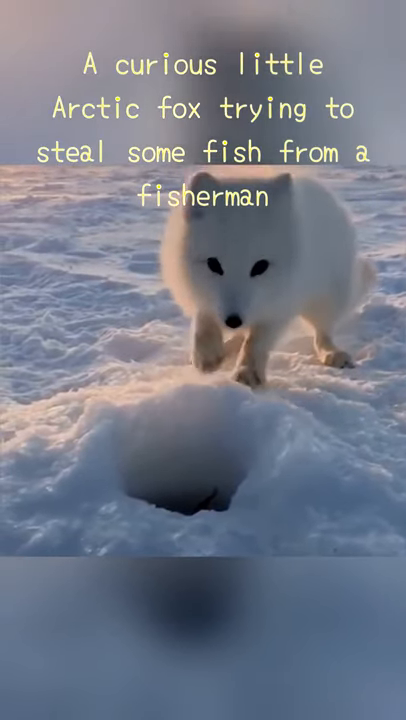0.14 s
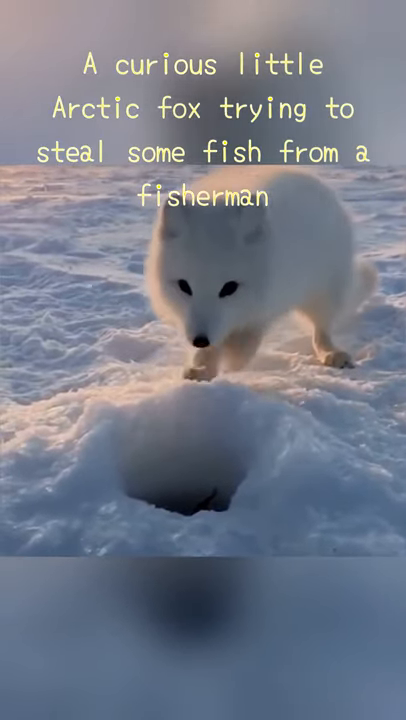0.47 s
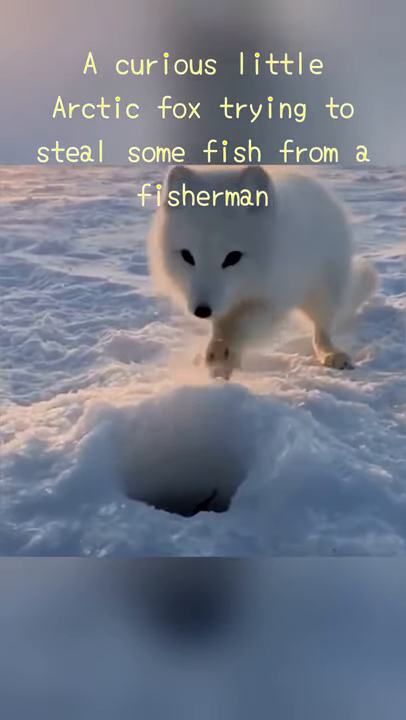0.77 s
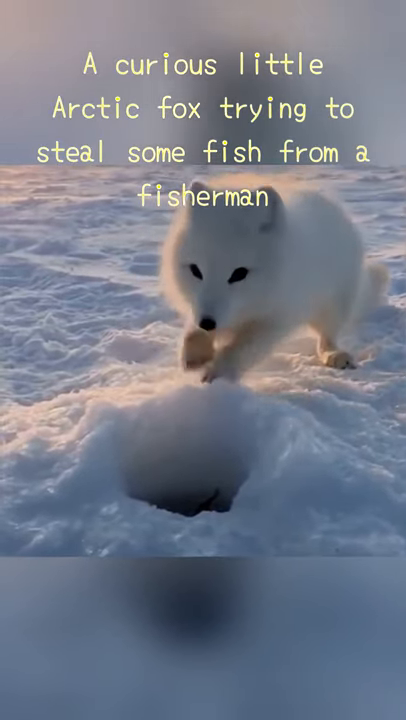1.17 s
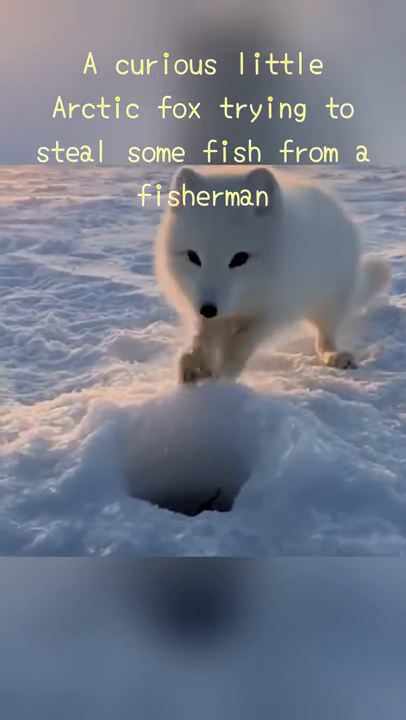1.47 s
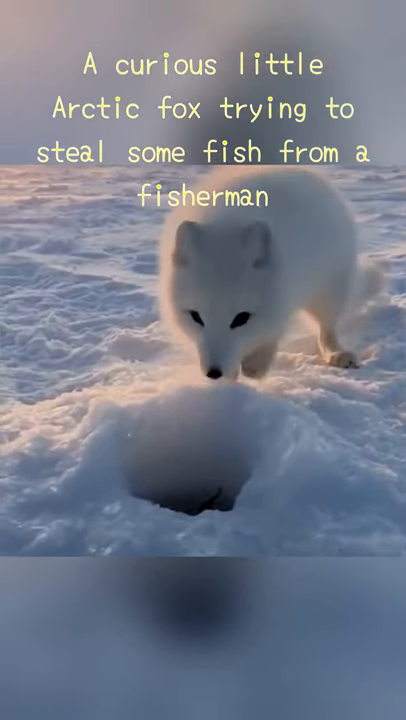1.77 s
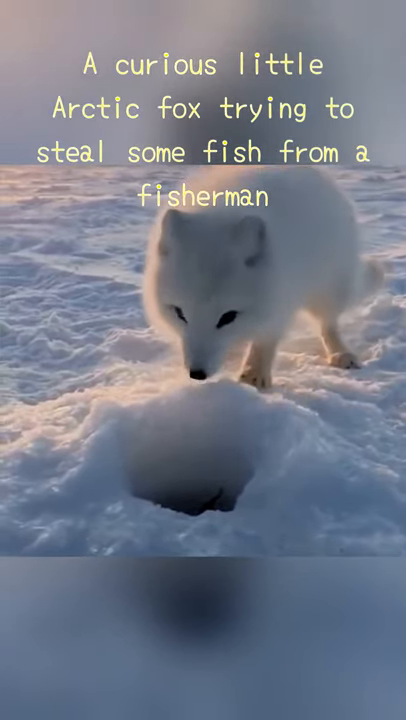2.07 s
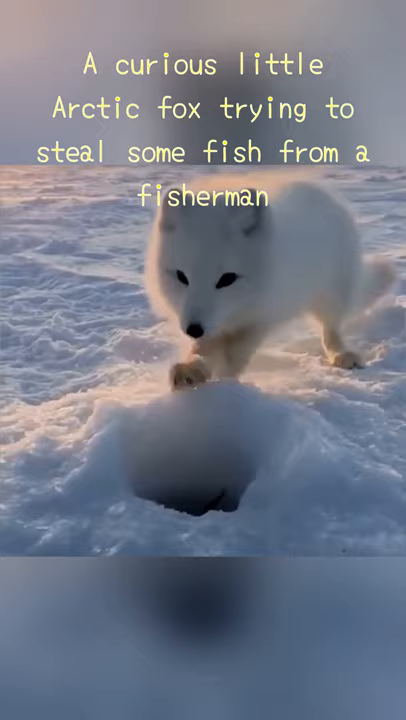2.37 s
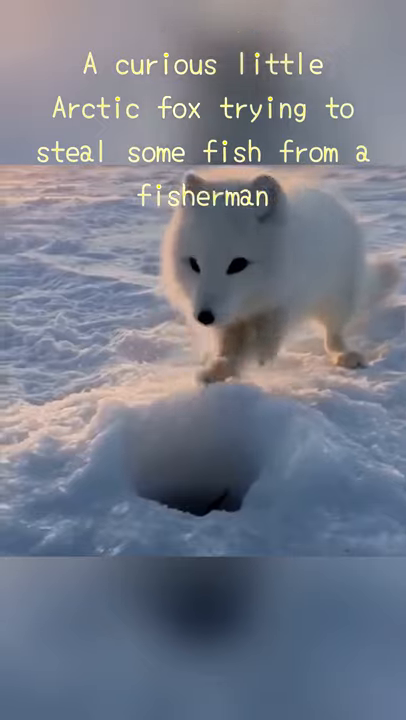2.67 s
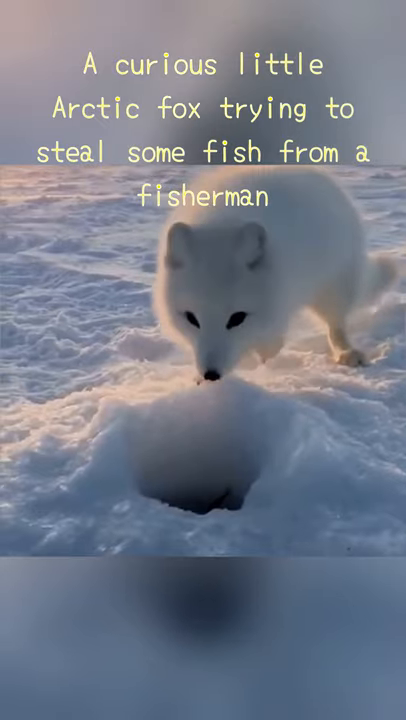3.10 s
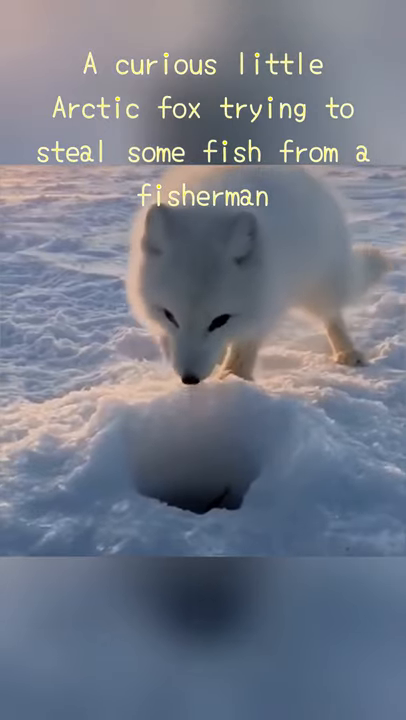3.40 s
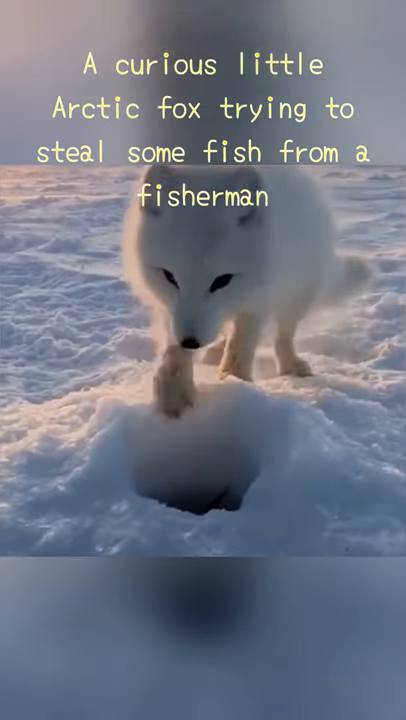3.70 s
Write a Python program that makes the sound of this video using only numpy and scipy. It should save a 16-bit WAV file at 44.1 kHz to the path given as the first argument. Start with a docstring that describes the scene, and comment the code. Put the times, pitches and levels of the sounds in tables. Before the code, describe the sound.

A fox digs in packed snow close to the microphone. Quick runs of scratchy, crunching paw strokes break off in short pauses, with small snaps of icy crust and a few soft thuds, in still open air.

```python
"""A fox digs in packed snow, close by, in quick runs of paw strokes with short pauses.
Each stroke breaks a swarm of ice grains: claws fizz on the crust, clumps crunch, the paw rumbles below.
Bits of crust snap, clods knock, ice splinters tinkle, and the snow thuds under the fox's weight.
Loose crystals tick as they settle; the open air adds a faint low rumble."""
import sys
import numpy as np
from scipy import signal
from scipy.io import wavfile
from scipy.ndimage import uniform_filter1d

SR = 44100
rng = np.random.default_rng(int(sys.argv[2]) if len(sys.argv) > 2 else 0)


def materialize(psi):
    """Save the field psi as 16-bit PCM at rate SR to the path in sys.argv[1].

    A 1-D psi becomes a single channel; in a 2-D psi each row is a channel.
    """
    bounded = np.clip(np.atleast_2d(psi).T, -1, 1)
    quanta = np.round(bounded * 32767).astype(np.int16)
    wavfile.write(sys.argv[1], SR, quanta)


N = 169785

# spectra: freq_hz, relative_density_db
AIR_SPECTRUM = [(15, -39), (25, -7), (108, 3.5), (301, -16), (818, -24), (5430, -30), (16000, -36)]
SNAP_SPECTRUM = [(600, -10), (1500, -0.5), (4000, -3.5), (12400, -1.5), (13400, -17)]
PUSH_SPECTRUM = [(30, -31), (52, -8), (80, -3), (350, -4), (520, -12), (2500, -35)]
CRUNCH_SPECTRUM = [(250, -17.5), (550, -9), (850, -8), (1400, -0.5), (4200, -4), (8000, -14)]
FIZZ_SPECTRUM = [(1200, -43.5), (2400, -6), (3500, -0.5), (6500, 0.5), (8500, -1), (10300, 3.5),
                 (12700, -0.5), (13300, -9), (16000, -9.5)]
# crust resonance and notch: centre_hz, width_hz, gain_db
CRUST_BANDS = [(2620, 190, 3.5), (3182, 36, -22)]
# paws bearing down: start_s, peak_db, pitch_hz
PAW_THUDS = [(.842, -37.5, 290), (1.338, -39.5, 299), (1.649, -41, 227), (2.770, -40.5, 343),
             (3.752, -47, 62)]
# ice splinters: start_s, peak_db
ICE_TINKLES = [(0.169, -48), (0.177, -36.5), (0.824, -19.5)]
# splinter modes: freq_hz, relative_db, t60_s
SPLINTER_MODES = [(6840, -13, 0.0069), (10750, 5, 0.0036)]
# clods knocking together: start_s, peak_db, pitch_hz
CLOD_KNOCKS = [(0.914, -47, 1420), (1.123, -50, 1460), (1.245, -49.5, 2360), (2.165, -52.5, 450)]
# crust breaking: start_s, peak_db
CRUST_SNAPS = [(.112, -50), (0.201, -50), (.322, -42.5), (0.329, -40.5), (0.355, -33), (.508, -27.5),
               (.706, -30), (0.744, -29), (0.84, -28), (0.846, -28), (.874, -29), (1.150, -34),
               (1.173, -39.5), (1.28, -43), (1.300, -33), (1.318, -27), (1.404, -28), (1.509, -26),
               (1.513, -26.5), (1.539, -31.5), (1.624, -29), (1.656, -27), (1.731, -29), (1.746, -22.5),
               (2.082, -46.5), (2.247, -36), (2.325, -18.5), (2.383, -33.5), (2.420, -24.5), (2.432, -19.5),
               (2.679, -25.5), (2.756, -28), (2.872, -24), (2.881, -28), (2.892, -25.5), (2.978, -27),
               (2.991, -23), (3.106, -30.5), (3.232, -42), (3.53, -54), (3.589, -36), (3.640, -26.5),
               (3.693, -27.5), (3.709, -30.5), (3.792, -38), (3.823, -39), (3.845, -34)]
# paw strokes: peak_s, rise_s, fall_s, fizz_db, crunch_db, push_db
PAW_STROKES = [ (.008, 0.05, 0.026, -44.5, -46.5, -51), (0.352, 0.012, 0.014, -51, -53.5, -56),
               (0.4, 0.026, 0.033, -42, -45.5, -47.5), (.485, 0.019, 0.0073, -49, -51, -62),
               (0.521, 0.012, 0.024, -38, -40.5, -45.5), (0.646, 0.041, 0.018, -40, -44, -46),
               (0.704, 0.013, 0.0089, -43, -46.5, -56), (0.753, .017, 0.028, -40, -44, -42),
               (0.809, 0.0095, 0.017, -47.5, -54.5, -54), (0.863, 0.017, 0.017, -39.5, -40.5, -43.5),
               (0.942, 0.015, 0.0061, -41, -47.5, -54), (0.983, 0.02, 0.031, -42, -45, -46),
               (1.066, 0.019, 0.016, -55.5, -59.5, -57), (1.175, 0.056, 0.076, -65.5, -69.5, -71.5),
               (1.308, 0.012, 0.035, -40, -48.5, -50.5), (1.34, 0.017, 0.019, -46, -40, -44),
               (1.422, 0.056, 0.028, -40, -44, -46), (1.542, 0.021, 0.035, -37, -43, -45),
               (1.66, 0.028, 0.022, -39, -46.5, -45.5), (1.753, 0.021, 0.038, -41, -41, -44.5),
               (1.843, 0.014, 0.0068, -49.5, -47.5, -53), (1.887, 0.015, 0.029, -48, -48.5, -49),
               (1.965, 0.069, 0.062, -69, -66.5, -65), (2.218, 0.012, 0.021, -58.5, -61.5, -55.5),
               (2.269, 0.022, 0.037, -50.5, -63, -58), (2.326, 0.035, 0.025, -36.5, -42.5, -43.5),
               (2.392, 0.012, 0.024, -49, -50, -51.5), (2.434, 0.022, 0.043, -38, -43, -44.5),
               (2.529, 0.023, 0.033, -38.5, -43, -43), (2.632, 0.021, 0.0089, -39.5, -46, -47.5),
               (2.696, 0.022, 0.028, -43, -47.5, -46), (2.765, 0.0078, 0.033, -37, -43, -41.5),
               (2.893, 0.039, 0.028, -38.5, -44.5, -44), (2.945, 0.0077, 0.005, -44, -51.5, -47.5),
               (2.992, 0.023, 0.034, -40.5, -42.5, -46), (3.123, 0.023, 0.016, -41.5, -46, -48),
               (3.16, 0.016, 0.032, -48.5, -52.5, -53), (3.260, 0.055, 0.09, -66, -68.5, -65),
               (3.618, .012, .025, -50, -64, -55), (3.656, 0.013, 0.023, -38.5, -46.5, -44),
               (3.692, 0.023, 0.017, -41, -51.5, -45.5), (3.848, .024, .029, -57, -55.5, -54)]


def amp(db):
    """Decibels to amplitude."""
    return 10 ** (np.asarray(db) / 20)


def unit(x):
    """Scale to unit RMS."""
    return x / np.sqrt(np.mean(x ** 2) + 1e-20)


def add(mix, start_s, sound):
    """Mix a sound in, in place."""
    part = mix[max(round(start_s * SR), 0):][:len(sound)]
    part += sound[:len(part)]


def colour(x, spectrum, bands=()):
    """Minimum-phase filter from a spectrum plus peaks and notches."""
    hz = np.fft.rfftfreq(8192, 1 / SR)
    freq_hz, density_db = np.transpose(spectrum)
    db = np.interp(np.log(hz + 1), np.log(freq_hz), density_db)
    for centre_hz, width_hz, gain_db in bands:
        db = db + gain_db / (1 + (2 * (hz - centre_hz) / width_hz) ** 2)
    log_gain = np.log(amp(np.r_[db, db[-2:0:-1]]))
    taps = np.fft.ifft(np.exp(np.conj(signal.hilbert(log_gain)))).real
    return signal.fftconvolve(x, taps[:len(hz)])[:len(x)]


def air(level_db=-67):
    """Faint outdoor rumble and hiss."""
    return amp(level_db) * unit(colour(rng.standard_normal(N), AIR_SPECTRUM))


def settling(rate_per_s=72, spread_db=4.5, decay_s=0.0042, level_db=-75.5):
    """Loosened crystals trickle back with tiny ticks."""
    size = amp(spread_db * np.minimum(rng.exponential(1, N), 2))
    impacts = size * (rng.random(N) < rate_per_s / SR)
    envelope = signal.lfilter([1], [1, -np.exp(-1 / (decay_s * SR))], impacts)
    return amp(level_db) * unit(colour(envelope * rng.standard_normal(N), SNAP_SPECTRUM))


def scatter(x, level_db, t60_s):
    """Direct sound plus sparse reflections off rough snow."""
    t = np.arange(SR // 3) / SR
    tail = rng.standard_normal(len(t)) * (rng.random(len(t)) < 0.1) * amp(-60 * t / t60_s)
    return x + amp(level_db) * signal.fftconvolve(x, tail / np.linalg.norm(tail))[:N]


def thuds(rise_cycles=1.36):
    """Snow gives under the fox's weight; deeper thuds swell more slowly."""
    out, t = np.zeros(N), np.arange(SR // 4) / SR
    for start_s, peak_db, pitch_hz in PAW_THUDS:
        age = t * pitch_hz / rise_cycles
        swell = (age * np.exp(1 - age)) ** 2
        add(out, start_s, amp(peak_db) * swell * np.sin(2 * np.pi * pitch_hz * t))
    return out


def tinkles():
    """Loose ice splinters ring high and briefly."""
    out, t = np.zeros(N), np.arange(SR // 16) / SR
    ring = sum(amp(db - 60 * t / t60_s) * np.sin(2 * np.pi * hz * t) for hz, db, t60_s in SPLINTER_MODES)
    for start_s, peak_db in ICE_TINKLES:
        add(out, start_s, amp(peak_db) * ring / abs(ring).max())
    return out


def clods(rub_s=0.0022, decay_s=0.001):
    """Loose clods rub and settle with rough, slightly pitched knocks."""
    out, t = np.zeros(N), np.arange(SR // 20) / SR
    for start_s, peak_db, pitch_hz in CLOD_KNOCKS:
        rub = rng.standard_normal(len(t)) * (t / rub_s) * np.exp(-t / rub_s)
        ring = np.exp(-t / decay_s) * np.sin(2 * np.pi * pitch_hz * t)
        knock = signal.fftconvolve(rub, ring)
        add(out, start_s, amp(peak_db) * knock / abs(knock).max())
    return out


def snaps(crack_s=0.00061, crumble_s=0.0047, crumble_db=-3.5):
    """Bits of crust break: a sharp crack, then a brief crumble."""
    out, t = np.zeros(N), np.arange(SR // 25) / SR
    fade = np.exp(-t / crack_s) + amp(crumble_db) * np.exp(-t / crumble_s)
    for start_s, peak_db in CRUST_SNAPS:
        crack = colour(rng.standard_normal(len(t)) * fade, SNAP_SPECTRUM, CRUST_BANDS)
        add(out, start_s, amp(peak_db) * crack / abs(crack).max())
    return out


def effort(layer, lag_s=0, rise_exponent=1.334, fall_exponent=0.94):
    """A layer's envelope: each stroke swells, eases, and stops as the paw lifts."""
    column = ("fizz", "crunch", "push").index(layer)
    t, power = np.arange(N) / SR - lag_s, np.zeros(N)
    for peak_s, rise_s, fall_s, *levels_db in PAW_STROKES:
        near = abs(t - peak_s) < 0.5
        offset_s = t[near] - peak_s
        lift_s = 1.91 * fall_s
        rising = abs(offset_s / rise_s) ** rise_exponent
        falling = abs(offset_s / fall_s) ** fall_exponent + abs(offset_s / lift_s) ** 10
        envelope = np.exp(-np.where(offset_s < 0, rising, falling))
        power[near] += (amp(levels_db[column]) * envelope) ** 2
    return np.sqrt(power)


def crackle(rate_per_s=140, re_fizz_db=-8):
    """Larger crystals give way under the claws with dry, bright clicks."""
    clicks = rng.uniform(-0.2, 1, N) * (rng.random(N) < rate_per_s / SR)
    return amp(re_fizz_db) * unit(colour(clicks, FIZZ_SPECTRUM)) * effort("fizz")


def grains(rate_per_s, spread_db, cap_spreads, even_s):
    """Random fractures of varied size, evened in power over longer spans."""
    size = amp(spread_db * np.minimum(rng.exponential(1, N), cap_spreads))
    clicks = size * rng.choice([-1, 1], N) * (rng.random(N) < rate_per_s / SR)
    span = int(even_s * SR) + 1
    power = uniform_filter1d(uniform_filter1d(clicks ** 2, span), span)
    return clicks / np.sqrt(abs(power) + 0.01 * np.mean(clicks ** 2))


def shards(low_hz, high_hz, decay_cycles, rate_per_s, spread_db, sizes):
    """Each fracture briefly rings one of several grain sizes."""
    clicks = grains(rate_per_s, spread_db, cap_spreads=1.12, even_s=0.031)
    size_index = rng.integers(0, sizes, N)
    out, t = np.zeros(N), np.arange(SR // 100) / SR
    for k, hz in enumerate(np.linspace(low_hz, high_hz, sizes)):
        ring = unit(np.exp(-t * hz / decay_cycles) * np.sin(2 * np.pi * hz * t))
        out += signal.oaconvolve(clicks * (size_index == k), ring)[:N]
    return out


def slips(top_hz, depth_db):
    """Gain flutter: the paw catches and slips, so grains come in clumps."""
    band = signal.butter(2, [top_hz / 4, top_hz], "bandpass", fs=SR, output="sos")
    wobble = unit(signal.sosfilt(band, rng.standard_normal(N)))
    return unit(amp(depth_db * np.clip(wobble, -2, 2)))


def shifting(x, width_hz, hold_s, depth_db):
    """Brief resonances come and go as broken snow changes shape."""
    frame, hop = 512, 128
    spectra = signal.stft(x, nperseg=frame, noverlap=frame - hop)[2]
    patches = rng.standard_normal(spectra.shape)
    spans = (round(width_hz * frame / SR) + 1, round(hold_s * SR / hop) + 1)
    for axis in (0, 1, 0, 1):
        patches = uniform_filter1d(patches, spans[axis], axis)
    spectra = spectra * amp(depth_db * unit(patches))
    return signal.istft(spectra, nperseg=frame, noverlap=frame - hop)[1][:N]


def digging(crunch_lag_s=0.0027, push_lag_s=0.0022, hollow_re_crunch_db=-9.5):
    """Claws fizz on the crust first; then the paw sinks with a dull push, and clumps crunch and ring."""
    catch = slips(top_hz=245, depth_db=1.5)
    fizz = shards(1980, 15100, decay_cycles=0.71, rate_per_s=3600, spread_db=5.5, sizes=14)
    crunch = shards(723, 4140, decay_cycles=0.8, rate_per_s=1500, spread_db=7.0, sizes=10)
    fizz = colour(fizz, FIZZ_SPECTRUM, CRUST_BANDS)
    fizz = shifting(fizz, width_hz=300, hold_s=0.022, depth_db=3.0)
    crunch = colour(crunch, CRUNCH_SPECTRUM, CRUST_BANDS)
    crunch = shifting(crunch, width_hz=260, hold_s=0.026, depth_db=3.5)
    hollow = shards(1217, 1682, decay_cycles=3.6, rate_per_s=220, spread_db=6.0, sizes=7)
    push = grains(rate_per_s=700, spread_db=9.5, cap_spreads=1.36, even_s=0.018)
    return (unit(fizz * catch) * effort("fizz")
            + unit(crunch * catch) * effort("crunch", crunch_lag_s)
            + amp(hollow_re_crunch_db) * unit(hollow) * effort("crunch", push_lag_s)
            + unit(colour(push, PUSH_SPECTRUM)) * effort("push", push_lag_s))


def scene():
    """Paws at work close by, in still open air; mono."""
    near = digging() + crackle() + snaps() + clods() + tinkles()
    return (scatter(near, level_db=-29.5, t60_s=0.085) + settling() + thuds() + air())[None]


def record(dry, cutoff_hz=15900):
    """Steep low-pass band limit."""
    taps = signal.firwin(401, cutoff_hz, window=("kaiser", 8), fs=SR)
    return signal.oaconvolve(dry, taps[None], "same")


dry = scene()
out = record(dry)
materialize(out)
```